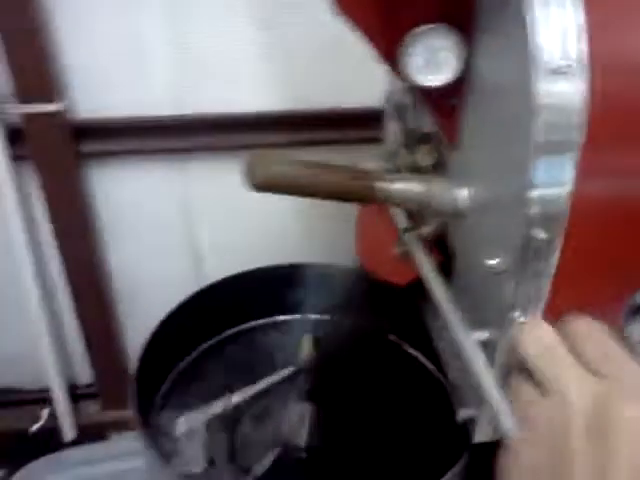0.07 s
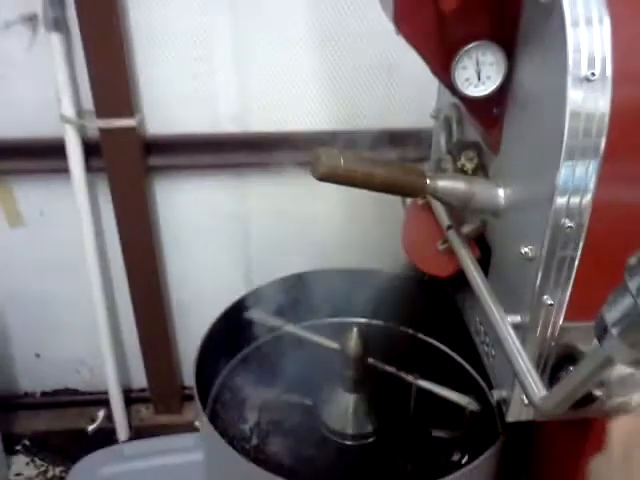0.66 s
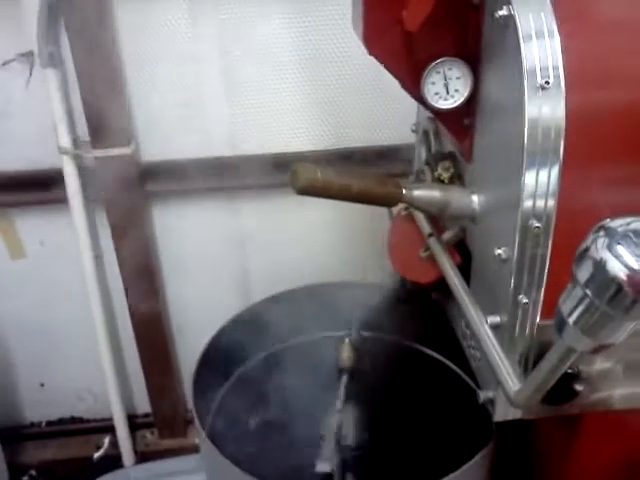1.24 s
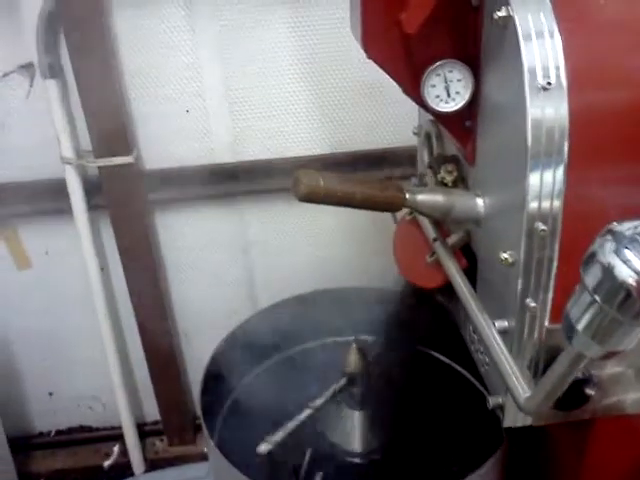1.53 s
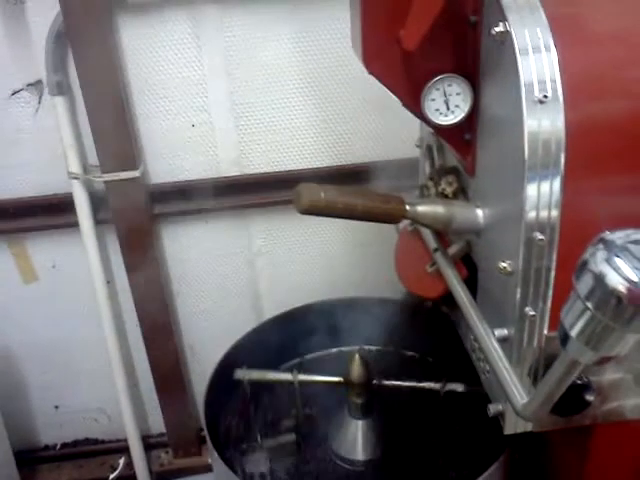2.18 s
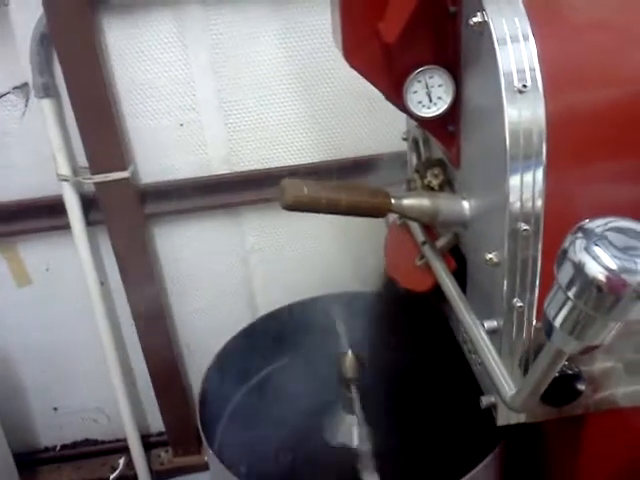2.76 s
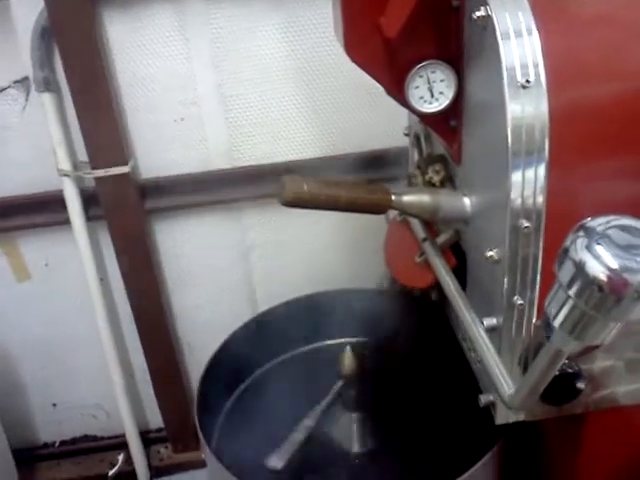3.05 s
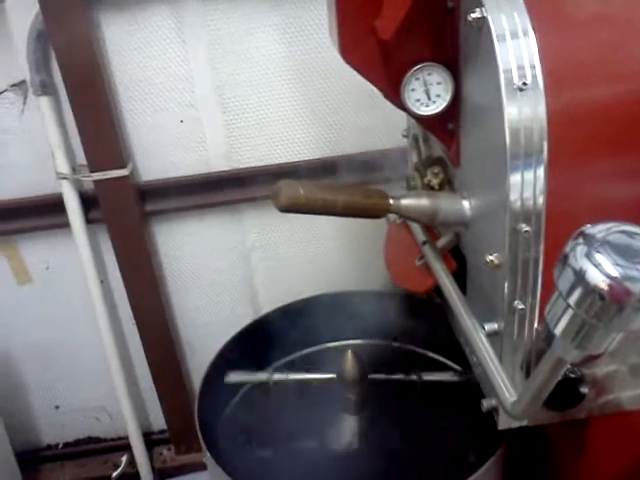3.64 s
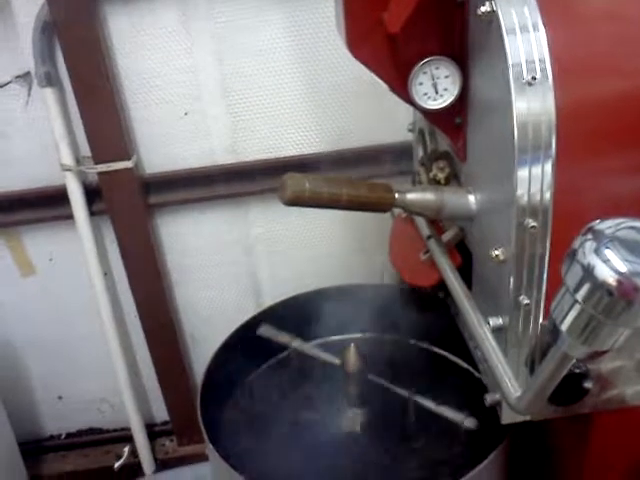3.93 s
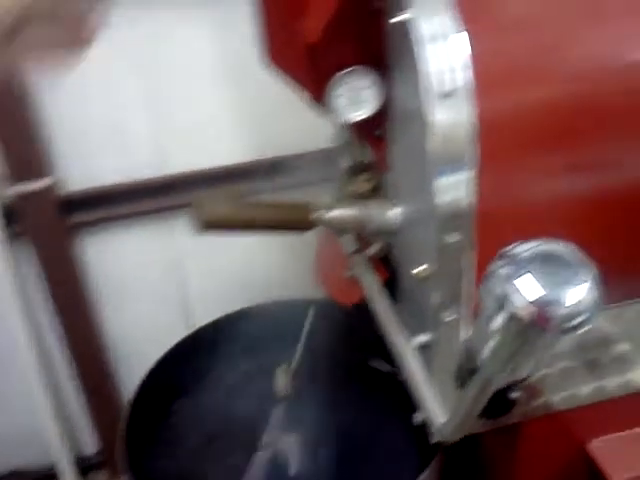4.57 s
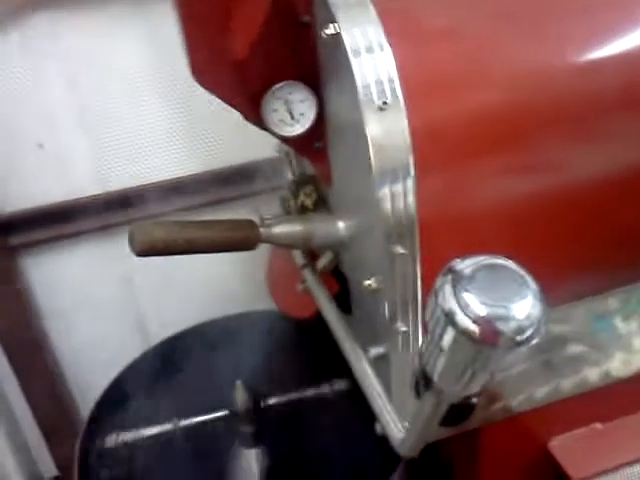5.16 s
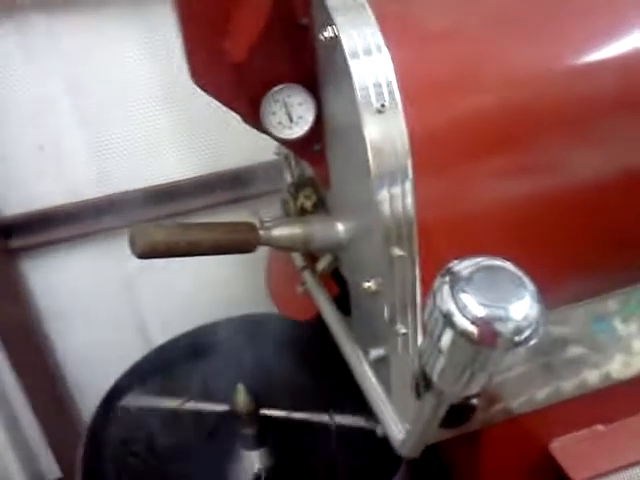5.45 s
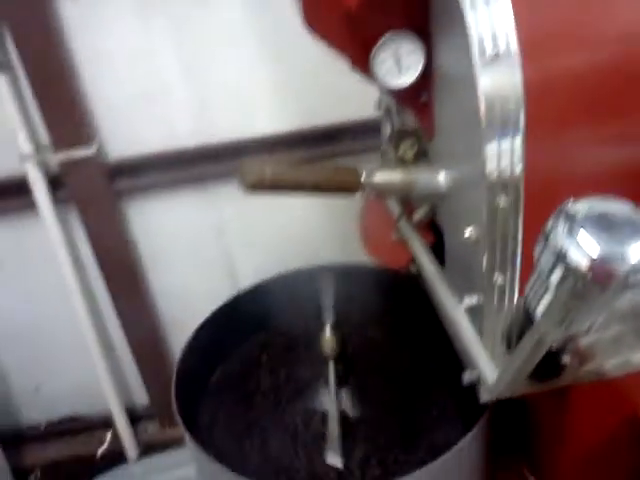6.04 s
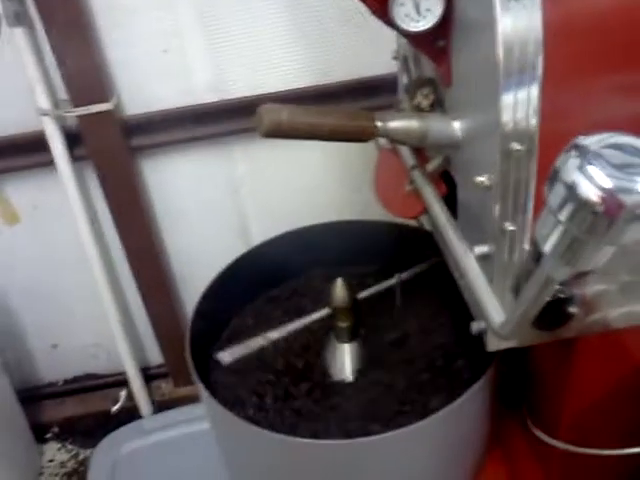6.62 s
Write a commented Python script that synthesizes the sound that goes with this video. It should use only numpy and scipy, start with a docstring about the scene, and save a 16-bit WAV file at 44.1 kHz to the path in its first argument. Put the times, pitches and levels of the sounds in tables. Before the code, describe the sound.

Hot beans pour rattling from a coffee roaster into a steel tray, with sharp cracks, brief squeals and a humming fan.

```python
"""Beside the cooling tray of a drum coffee roaster, heard through a close narrow-band microphone.
Hot beans pour onto the steel in surges, one per drum vane: they rattle, rustle on the heap, slide
and now and then crack. The stirring arm drags and squeals, the tray bumps, the stream thins out.
Underneath, the cooling fan blows; motors hum and panels buzz at multiples of twice mains frequency."""
import sys
import numpy as np
from scipy import signal
from scipy.fft import rfft, irfft
from scipy.io import wavfile

SR = 44100
rng = np.random.default_rng(int(sys.argv[2]) if len(sys.argv) > 2 else 0)


def persist_wave(psi):
    """Save psi, clipped to +-1, as 16-bit WAV."""
    counts = np.round(np.clip(psi, -1, 1) * 32767).astype(np.int16)
    wavfile.write(sys.argv[1], SR, np.atleast_2d(counts).T)


N = 304290
TIME = np.arange(N) / SR

# bean stream, thinning as the drum empties: (time [s], level [dB])
FLOW_CURVE = [(0, -18), (.7, -22), (1.15, -23), (1.7, -22), (2.6, -22.5), (3.2, -22.5), (4.0, -23.5),
              (4.65, -22.5), (5.0, -24.5), (5.8, -28.5), (6.25, -34), (6.9, -35.5)]
# gushes in the stream: (time [s], level change [dB])
FLOW_GUSHES = [(1.33, 3), (1.912, 2), (3.052, 3), (3.33, 1.5), (3.869, 1.5), (4.22, 3), (4.6, 0),
               (5.47, -1), (5.69, 1.5)]
# beans sliding over steel: (time [s], level [dB])
SLIDE_CURVE = [(0, -34), (1.4, -29), (1.9, -28), (3.0, -30.5), (4.2, -29.5), (4.5, -34.5), (5.4, -36.5),
               (6.2, -42), (6.9, -47.5)]
# beans landing on steel: (frequency [Hz], gain [dB])
RATTLE_SPECTRUM = [(2000, -23.5), (2600, -6), (2850, 0), (3050, -1), (3300, 2.5), (3550, -2), (3800, -4.5),
                   (4600, -6)]
# beans landing on the heap: (frequency [Hz], gain [dB])
RUSTLE_SPECTRUM = [(150, -14.5), (350, -4), (600, -4), (1000, 0.5), (1400, 1), (1700, 0.5), (2000, 0.5),
                   (2400, -8.5), (3000, -32)]
# beans sliding: (frequency [Hz], gain [dB])
SLIDE_SPECTRUM = [(1800, -20), (2100, -2.5), (2280, 5), (2380, -1), (2470, -1), (2600, -0.5), (2900, -25)]
# steel kept ringing by the beans: (frequency [Hz], width [Hz], level re rattle [dB])
STEEL_MODES = [(721, 26, -26.5), (1011, 40, -23), (1351, 47, -20), (1638, 16, -23), (1675, 51, -23),
               (2373, 36, -25), (3420, 25, -25), (3260, 12, -12.5), (3573, 11, -16)]
# machine balance: (time [s], drone gain [dB], deepest hum gain [dB], buzz gain [dB])
MACHINE_CURVES = [(0, -3.5, -2.5, 5), (4.5, -1, -3.5, 7), (5.3, 5, 0, 0.5), (6.0, .5, 5, 4),
                  (6.3, 4.5, 5.5, -3), (6.9, 5, 7.5, 0.5)]
# fan air: (frequency [Hz], gain [dB])
AIR_SPECTRUM = [(20, -19), (35, -16), (60, -3.5), (110, 0), (190, -1), (300, 3), (450, 1), (800, 0),
                (1500, -12.5), (3000, -11), (4400, -7.5)]
# fan and gear drive: (frequency [Hz], level [dB])
DRIVE_TONES = [(266.5, -53.5), (327.7, -45), (736.8, -53)]
# motor hum: (multiple of HUM_HZ, level [dB])
HUM_HARMONICS = [(2, -50.5), (3, -48.5), (4, -51.5), (5, -54), (6, -52), (8, -52), (9, -48.5), (10, -52.5),
                 (12, -48.5), (15, -59.5), (17, -57.5)]
# panel buzz: (multiple of HUM_HZ, level [dB])
BUZZ_HARMONICS = [(20, -48.5), (21, -47), (22, -54), (23, -53), (24, -46), (25, -44), (26, -43), (27, -49),
                  (28, -47), (29, -47), (31, -51)]
# steel squeals and, near the end, swelling tones of the panel buzz:
# (time [s], half-span [s], pitch [Hz], level [dB])
SQUEALS_AND_BUZZ_SWELLS = [(0.13, .07, 3612, -26), (0.28, .08, 3569, -26), (0.47, .06, 3118, -24),
                           (0.47, .07, 2390, -30), (0.52, .08, 1600, -28), (1.35, .11, 1606, -30),
                           (1.52, .07, 1606, -34), (1.655, .07, 2382, -21), (2.2, .1, 1600, -28),
                           (2.26, .05, 1372, -32), (2.495, .09, 2385, -22), (2.562, .045, 1368, -26),
                           (2.85, .08, 1663, -30), (3.11, .1, 3310, -28), (3.34, .06, 3192, -23),
                           (3.51, .08, 2390, -28), (3.635, .05, 1368, -27), (3.85, .07, 1372, -27),
                           (3.9, .04, 3550, -23), (3.91, .08, 1603, -32), (4.015, .06, 1372, -28),
                           (4.08, .07, 2390, -29), (4.25, .12, 3359, -23), (4.28, .1, 1604, -29),
                           (4.31, .05, 1372, -32), (4.38, .09, 3353, -23), (4.415, .07, 1368, -26),
                           (4.53, .12, 1603, -33), (4.62, .12, 3353, -27), (4.83, .06, 3246, -26),
                           (5.17, .05, 3348, -27), (5.56, .14, 2515, -32), (5.58, .08, 3041, -30),
                           (5.65, .2, 3121, -32), (5.92, .22, 3121, -31), (6.03, .1, 2510, -36),
                           (6.18, .12, 3122, -35), (6.53, .07, 3550, -26)]
# beans cracking or hitting hard: (time [s], tick level [dB], knock level [dB])
BEAN_CRACKS = [(0.1466, -6.0, -23.0), (0.2094, -5.0, -18.0), (0.3525, -9.0, -23.0), (0.578, -11.0, -22.0),
               (0.6957, -9.0, -25.0), (1.3214, -5.0, -21.0), (1.5544, -7.0, -21.0), (1.8046, -2.0, -20.0),
               (1.9129, -5.0, -13.0), (1.9548, -6.0, -19.0), (2.187, -3.0, -13.0), (2.1923, -5.0, -16.0),
               (2.3074, -4.0, -14.0), (2.8989, -5.0, -19.0), (3.1781, -6.0, -21.0), (3.3273, -5.0, -20.0),
               (3.899, -8.0, -20.0), (4.0376, -5.0, -21.0), (4.1609, -4.5, -22.0), (4.1935, -6.0, -22.0),
               (4.2785, -5.0, -22.0), (4.564, -4.0, -22.0), (4.8006, -4.0, -14.0), (5.1078, -9.0, -23.0),
               (5.158, -10.0, -26.0), (5.3921, -6.0, -13.0), (5.4753, -6.0, -26.0), (5.952, -12.0, -13.0),
               (6.1599, -13.0, -26.0), (6.3822, -12.5, -26.0)]
# dull tray bumps: (time [s], half-span [s], level [dB])
TRAY_BUMPS = [(0.215, .05, -31), (1.915, .02, -32), (4.765, .05, -28), (5.39, .04, -33), (5.965, .04, -38)]
# low tray resonances: (frequency [Hz], width [Hz], gain [dB])
TRAY_MODES = [(200, 99, -8), (323, 51, -3), (484, 110, 6), (466, 330, 2), (705, 10, -2.5)]
# thin, bright clipping clicks on the two loudest cracks: (time [s], level [dB])
OVERLOAD_CLICKS = [(1.805, -19), (2.1872, -30)]
# microphone response, steep treble fall: (frequency [Hz], gain [dB])
MIC_RESPONSE = [(10, -1.5), (3500, 1), (3700, -1.5), (3830, -9.5), (4000, -14.5), (4350, -20.5),
                (4480, -24.5), (4620, -46.5), (5000, -76)]

DRUM_TURNS_PER_S, VANES = 1.15, 3
FIRST_SURGE_S, HEAP_LAG_S, FIRST_SLIDE_S, GUSH_S = .155, .04, .35, .069
RATTLE_DB, RATTLE_SURGE_DB, RATTLE_DRIFT_DB = -1.6, 1.0, -.06
RUSTLE_DB, RUSTLE_SURGE_DB, RUSTLE_DRIFT_DB = -31, 1.03, 1.72
RUSTLE_FLOW_SHARE, RUSTLE_GUSH_SHARE = .51, .93
SLIDE_SWING_DB, SLIDE_SURGE_DB = 1.7, 2.1
BRIGHT_DB, BRIGHT_DRIFT_DB = -1.1, 3.5  # balance of hard and soft landings
AIR_DB, TONE_SWELL_DB, TICK_DB, KNOCK_DB = -36.5, 2, -2.5, 1
HUM_HZ, CUTOFF_HZ = 120.02, 16000


def from_db(db):
    """Decibels to gain."""
    return 10 ** (np.asarray(db) / 20)


def unit_rms(x):
    """Scale to rms 1."""
    return x / np.sqrt(np.mean(x ** 2) + 1e-20)


def curves(rows):
    """One linearly interpolated time curve per value column."""
    times_s, *columns = np.transpose(rows)
    return [np.interp(TIME, times_s, column) for column in columns]


def drift(corner_hz):
    """Low-passed random wander, rms 1."""
    hop, settle = 40, 2000
    r = np.exp(-2 * np.pi * corner_hz * hop / SR)
    slow = signal.lfilter([1], [1, -2 * r, r * r], rng.standard_normal(N // hop + settle + 2))[settle:]
    return np.interp(np.arange(N) / hop, np.arange(len(slow)), unit_rms(slow))


def colour(x, spectrum):
    """Minimum-phase filter; falls 24 dB/octave beyond the spectrum's ends."""
    size = 8192
    hz, db = np.transpose(spectrum)
    octave = np.log2(np.maximum(np.arange(size // 2 + 1) * SR / size, 1))
    knots = np.log2(hz)
    shape_db = np.interp(octave, knots, db) - 24 * abs(octave - np.clip(octave, knots[0], knots[-1]))
    cepstrum = irfft(np.log(from_db(shape_db)))[:size // 2]
    cepstrum[1:] *= 2
    return signal.fftconvolve(x, irfft(np.exp(rfft(cepstrum, size))))[:N]


def resonance(x, hz, width_hz):
    """Two-pole band-pass, peak gain 1."""
    r = np.exp(-np.pi * width_hz / SR)
    feedback = [1, -2 * r * np.cos(2 * np.pi * hz / SR), r * r]
    return signal.lfilter(np.array([1, 0, -1]) * (1 - r * r) / 2, feedback, x + 1e-18)


def swell(centre_s, half_span_s):
    """Raised-cosine window, peak 1."""
    return np.cos(np.pi / 2 * np.clip((TIME - centre_s) / half_span_s, -1, 1)) ** 2


def cycle(hz, crest_s):
    """Cosine with a crest at crest_s."""
    return np.cos(2 * np.pi * hz * (TIME - crest_s))


def pour():
    """Rattle, rustle and slide levels: each vane pushes a surge onto the steel, then the heap."""
    flow_db, = curves(FLOW_CURVE)
    slide_db, = curves(SLIDE_CURVE)
    gush_db = sum(db * swell(at_s, GUSH_S) for at_s, db in FLOW_GUSHES)
    surge = cycle(VANES * DRUM_TURNS_PER_S, FIRST_SURGE_S)
    landing = cycle(VANES * DRUM_TURNS_PER_S, FIRST_SURGE_S + HEAP_LAG_S)
    rattle_db = RATTLE_DB + flow_db + gush_db + RATTLE_SURGE_DB * surge + RATTLE_DRIFT_DB * drift(4.4)
    rustle_db = (RUSTLE_DB + RUSTLE_FLOW_SHARE * (flow_db - flow_db.max()) + RUSTLE_GUSH_SHARE * gush_db
                 + RUSTLE_SURGE_DB * landing + RUSTLE_DRIFT_DB * drift(15))
    slide_db += SLIDE_SWING_DB * cycle(2 * DRUM_TURNS_PER_S, FIRST_SLIDE_S) + SLIDE_SURGE_DB * surge
    return rattle_db, rustle_db, slide_db


def contacts(per_s, spread_db, ring_t60_s, room_t60_s, wet):
    """Random bean contacts of uneven size: noise under a short ring and a room tail."""
    size_db = spread_db * np.minimum(rng.exponential(1, N), 3)
    energy = from_db(2 * size_db) * (rng.random(N) < per_s / SR) / per_s
    t = TIME[:SR // 4]
    ring, room = from_db(-120 * t / ring_t60_s), from_db(-120 * t / room_t60_s)  # power decays
    decay = ring / ring.sum() + wet * room / room.sum()
    power = irfft(rfft(energy) * rfft(decay, N), N)
    return unit_rms(np.sqrt(abs(power)) * rng.standard_normal(N))


def pings(count, low_hz, high_hz, t60_s):
    """Square hits, each ringing one high steel mode."""
    out, t = np.zeros(N + SR), TIME[:SR // 6]
    for when, pitch, softness in rng.random((count, 3)):
        start = int(when * N)
        hz = low_hz * (high_hz / low_hz) ** pitch
        ring = np.sin(2 * np.pi * hz * t) * from_db(-60 * t / t60_s)
        out[start:start + len(t)] += from_db(-10 * softness) * ring
    return unit_rms(out[:N])


def beans():
    """Thousands of light contacts: bright on steel, dull on the heap, gritty when sliding."""
    rattle_db, rustle_db, slide_db = pour()
    bright_db = BRIGHT_DB + BRIGHT_DRIFT_DB * drift(13)
    hits_per_s = 1300 * from_db(rattle_db - rattle_db.max())
    rattle = 0
    for band, sign in (("low", -1), ("high", 1)):  # soft, hard landings
        hits = contacts(hits_per_s, spread_db=3.2, ring_t60_s=.014, room_t60_s=.15, wet=.6)
        crossover = signal.butter(8, 3250, band, fs=SR, output="sos")
        hits = unit_rms(signal.sosfilt(crossover, colour(hits, RATTLE_SPECTRUM)))
        rattle += from_db(2.6 * sign) * hits / np.sqrt(1 + from_db(-2 * sign * bright_db))
    steel = sum(from_db(db) * unit_rms(resonance(rng.standard_normal(N), hz, width_hz))
                for hz, width_hz, db in STEEL_MODES)
    steel += from_db(-4.5) * pings(count=420, low_hz=2900, high_hz=3620, t60_s=.12)
    rustle = contacts(per_s=800, spread_db=4, ring_t60_s=.016, room_t60_s=.12, wet=1)
    slide = contacts(per_s=1500, spread_db=4, ring_t60_s=.02, room_t60_s=.25, wet=.8)
    return (from_db(rattle_db) * (rattle + steel)
            + from_db(rustle_db) * unit_rms(colour(rustle, RUSTLE_SPECTRUM))
            + from_db(slide_db - 3) * unit_rms(colour(slide, SLIDE_SPECTRUM)))


def tones(lines, waver_db, waver_hz, waver_rad):
    """Sines wavering in level and phase; lines: (frequency [Hz], level [dB])."""
    out = np.zeros(N)
    for hz, db in lines:
        gain = from_db(db + waver_db * drift(waver_hz))
        out += gain * np.sin(2 * np.pi * (hz * TIME + rng.random()) + waver_rad * drift(waver_hz))
    return np.sqrt(2) * out


def machine():
    """Fan air, drive tones, motor hum and sheet metal buzzing with it."""
    drone_db, deep_db, buzz_db = curves(MACHINE_CURVES)
    air = from_db(AIR_DB + 1.8 * drift(7.8)) * unit_rms(colour(rng.standard_normal(N), AIR_SPECTRUM))
    deepest, second, *upper = [(k * HUM_HZ, db) for k, db in HUM_HARMONICS]
    deep = tones([deepest], waver_db=1.2, waver_hz=3, waver_rad=.2)
    drone = tones([second, *DRIVE_TONES], waver_db=1.2, waver_hz=3, waver_rad=.2)
    whine = tones(upper, waver_db=2, waver_hz=3, waver_rad=.25)
    buzz = tones([(k * HUM_HZ, db) for k, db in BUZZ_HARMONICS], waver_db=2.2, waver_hz=5, waver_rad=.8)
    return air + from_db(deep_db) * deep + from_db(drone_db) * drone + whine + from_db(buzz_db) * buzz


def squeals_and_buzz_swells():
    """Steel squeals and, near the end, swelling panel-buzz tones; unsteady in pitch and level."""
    pitch_ratio = 1 + .0015 * drift(40)
    gain = from_db(1.2 * drift(30) + 2 * drift(160) + TONE_SWELL_DB)
    rad_per_hz = 2 * np.pi * np.cumsum(pitch_ratio) / SR
    jitter_rad = .45 * drift(120)
    return gain * sum(from_db(db) * swell(at_s, half_span_s) ** 2 * np.sin(hz * rad_per_hz + jitter_rad)
                      for at_s, half_span_s, hz, db in SQUEALS_AND_BUZZ_SWELLS)


def burst(t, rise_s, hz):
    """A few cycles; the envelope peaks at 1 after rise_s."""
    return t / rise_s * np.exp(1 - t / rise_s) * np.sin(2 * np.pi * hz * t)


def cracks():
    """Beans snap: hard-edged tick and duller knock, then scatter from the tray."""
    out, t = np.zeros(N), TIME[:SR // 30]
    for at_s, tick_db, knock_db in BEAN_CRACKS:
        tick_detune, knock_detune = rng.normal(size=2)
        scatter = rng.standard_normal(len(t)) * from_db(-60 * t / .03) * (t > .0015)
        edge = .45 * burst(t, rise_s=.00025, hz=4100)
        tick = burst(t, rise_s=.0005, hz=3300 + 60 * tick_detune) + edge
        tick += 1.1 * resonance(scatter, hz=3300, width_hz=700)
        knock = burst(t, rise_s=.0004, hz=1100 * np.exp(.3 * knock_detune))
        knock += .7 * resonance(scatter, hz=1000, width_hz=1200)
        snap = from_db(tick_db + TICK_DB) * tick + from_db(knock_db + KNOCK_DB) * knock
        start = round(at_s * SR)
        out[start:start + len(t)] += snap
    return out


def bumps():
    """Short shudders of the tray's low modes."""
    shake = rng.standard_normal(N)
    body = sum((-1) ** k * from_db(db) * resonance(shake, hz, width_hz)
               for k, (hz, width_hz, db) in enumerate(TRAY_MODES))
    envelope = sum(from_db(db) * swell(at_s, half_span_s) for at_s, half_span_s, db in TRAY_BUMPS)
    return unit_rms(body) * envelope


def overload_clicks():
    """Thin, bright clipping clicks, made as filtered impulses at set times."""
    clicks = np.zeros(N)
    for at_s, db in OVERLOAD_CLICKS:
        clicks[round(at_s * SR)] = from_db(db)
    broad = 2 * resonance(clicks, hz=4600, width_hz=9000)
    return broad + from_db(9) * resonance(clicks, hz=4300, width_hz=1500)


def scene():
    """Mono mix through the dull microphone; only the overload clicks bypass its response."""
    roaster = beans() + cracks() + squeals_and_buzz_swells() + bumps() + machine()
    return (colour(roaster, MIC_RESPONSE) + overload_clicks())[None]


def record(dry):
    """Steep low-pass at CUTOFF_HZ."""
    return signal.sosfilt(signal.ellip(8, .2, 70, CUTOFF_HZ, fs=SR, output="sos"), dry)


dry = scene()
out = record(dry)
persist_wave(out)
```